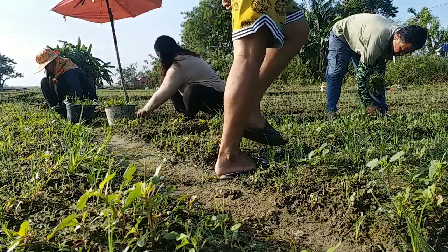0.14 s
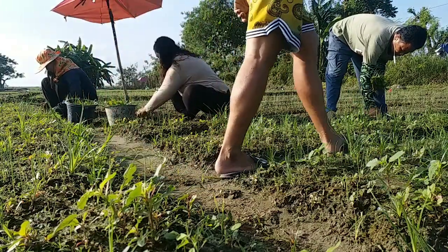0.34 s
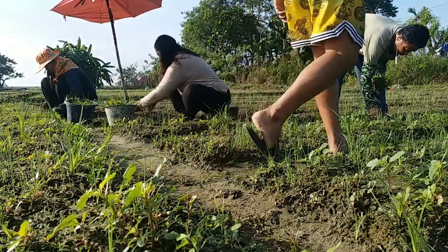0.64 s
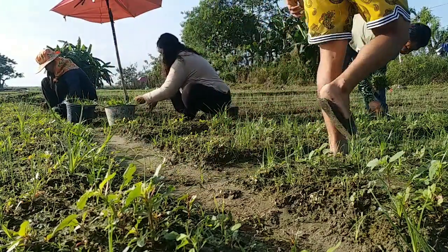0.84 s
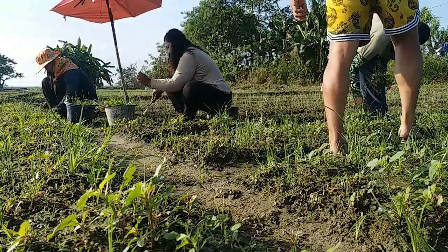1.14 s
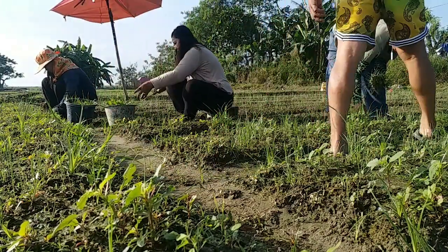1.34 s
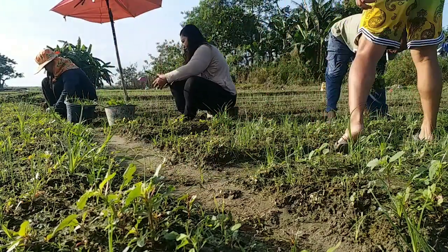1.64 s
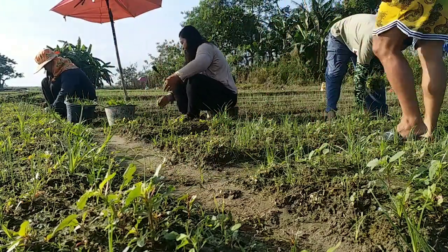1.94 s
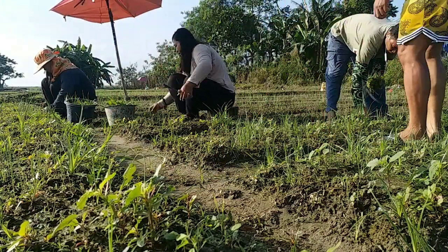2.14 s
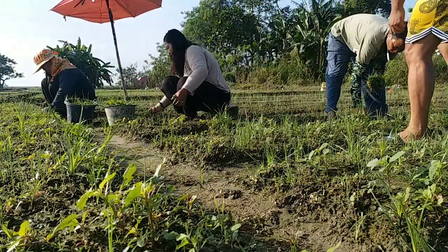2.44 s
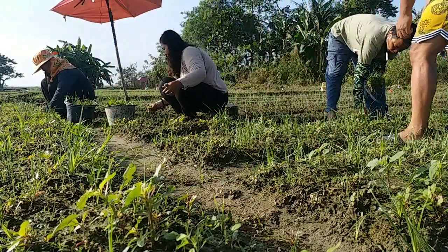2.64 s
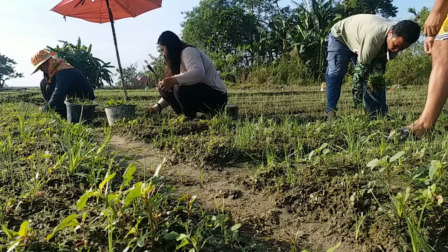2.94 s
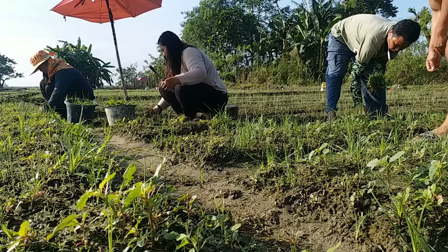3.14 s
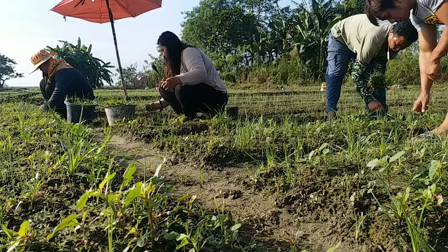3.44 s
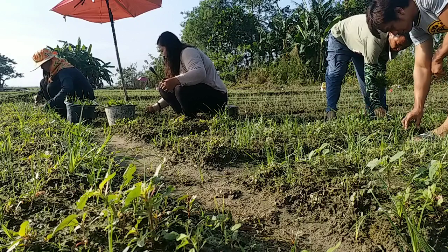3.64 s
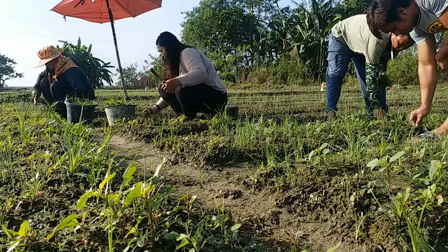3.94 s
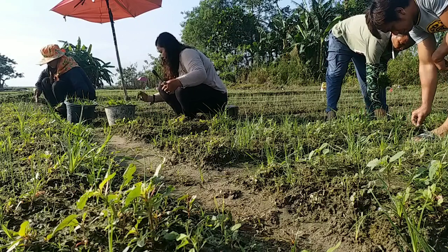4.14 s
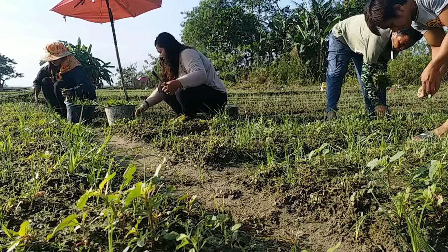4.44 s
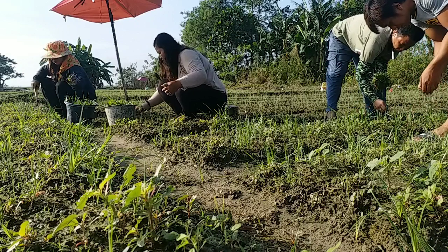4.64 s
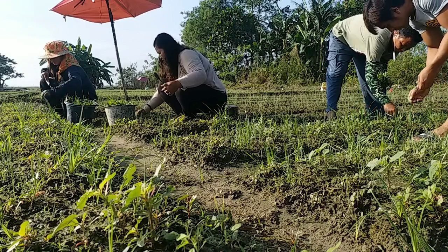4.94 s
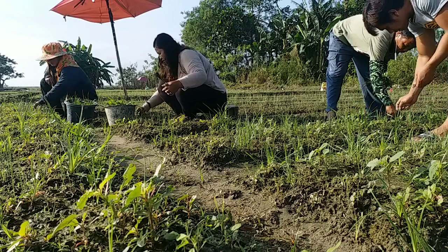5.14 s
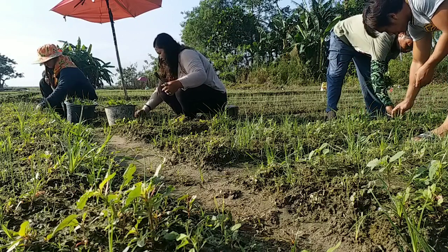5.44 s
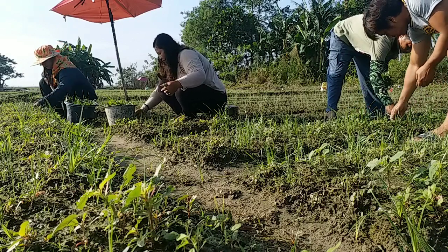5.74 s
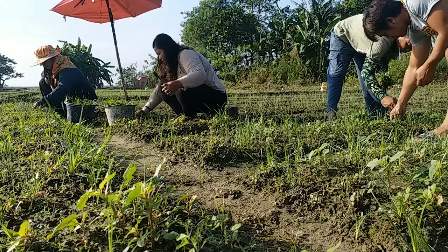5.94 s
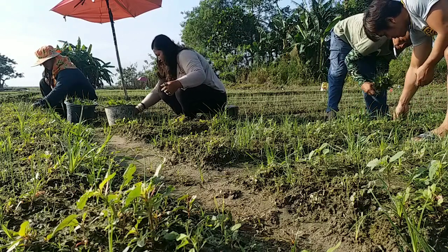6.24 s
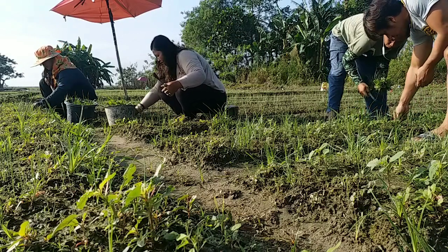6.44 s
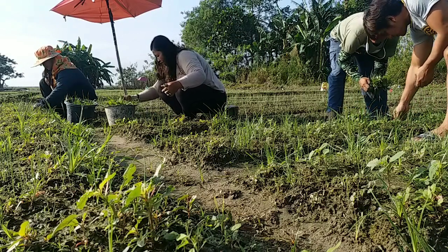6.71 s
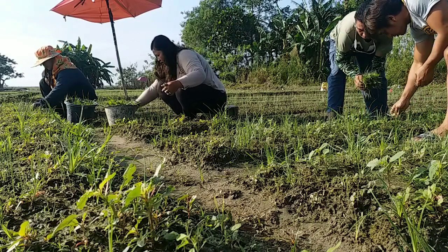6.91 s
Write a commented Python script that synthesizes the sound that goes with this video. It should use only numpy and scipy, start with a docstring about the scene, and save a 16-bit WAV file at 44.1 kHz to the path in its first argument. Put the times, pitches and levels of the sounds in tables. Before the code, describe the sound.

A small engine runs to the right of the microphone at an open vegetable field, booming and clattering. Sandals brush and slap through seedlings and loose parts knock while it slows. A wavering drone comes in as it sinks to a quiet, lumpy idle. It then picks up at low speed with a loose panel rattling, and a small bird chirps faintly three times. A faint hiss lies underneath.

```python
"""A four-cylinder engine runs beside a vegetable field: each firing drives a boom through the exhaust
and a roar and clatter through the resonant block. For three seconds sandals brush through seedlings
and loose parts knock, while the engine slows. A wavering drone enters as it sinks to a lumpy idle,
slowest at 4.4 s. It then picks up at low speed; from 5.3 s the firings shake a loose panel, near 5.8 s
a small bird chirps three times, and loose parts rattle again. A faint hiss lies under it all."""
import sys
import numpy as np
from scipy import signal
from scipy.fft import rfft, irfft
from scipy.io import wavfile
from scipy.ndimage import uniform_filter1d

SR = 44100
rng = np.random.default_rng(int(sys.argv[2]) if len(sys.argv) > 2 else 0)


def generate_wav(sig):
    """Save sig (samples, or channels by samples) to the path in sys.argv[1] as 16-bit PCM at SR."""
    pcm = np.round(np.clip(np.atleast_2d(sig).T, -1, 1) * 32767).astype(np.int16)
    wavfile.write(sys.argv[1], SR, pcm)


N = 311787
T = np.arange(N) / SR
HZ = np.maximum(np.fft.rfftfreq(N, 1 / SR), 1)

# side signal relative to mid signal in stereo noise: f/Hz, level/dB
SIDE_SPECTRUM = [(60, -26), (600, -16), (1200, -8), (2500, -5), (6000, -2)]
# cues of a source on the right: f/Hz, left minus right level/dB, lag of the left side/ms
DIRECTION_CUES = [(60, 1, .66), (130, -.3, .53), (270, -1, .35), (600, .3, .39), (1220, .5, .42),
                  (2000, -3.5, .41), (5200, -4.5, .41), (8000, 0, .41)]
# spectra of the broad hiss, the thin hiss and brushed leaves: f/Hz, level/dB
AIR_SPECTRUM = [(30, 19.5), (1000, -1.5), (6000, -3), (15500, -3.5)]
THIN_SPECTRUM = [(5500, -16), (6900, -17.5), (7500, 2), (7950, -2.5), (8200, -13)]
LEAF_SPECTRUM = [(2600, -8), (3450, 4), (4600, -2), (6000, -7), (7800, -12), (9000, -22), (14000, -30)]
# bird chirps: t/s, level/dB, highest f/Hz
BIRD_CHIRPS = [(5.826, -45, 3450), (5.864, -46.5, 3380), (5.908, -49.5, 3300)]
# sandals brushing through plants: t/s, level/dB, half length/s
LEAF_BRUSHES = [(0.467, -43.5, 0.023), (2.258, -53.5, 0.042), (2.502, -54, 0.072), (2.856, -53, 0.038),
                (2.967, -43, 0.021), (3.17, -44.5, 0.013), (3.206, -44, 0.016)]
# sandal slaps and snapping stalks: t/s, level/dB, centre f/Hz
SLAPS_AND_SNAPS = [(.442, -26.5, 6000), (1.461, -19.5, 3300), (2.964, -33, 4300), (3.176, -37.5, 4400),
                   (3.197, -39.5, 4900), (3.211, -37.5, 4600)]
# loose parts knocking: t/s, level/dB, centre f/Hz
LOOSE_KNOCKS = [(1.224, -24.5, 1780), (2.04, -18, 430), (2.467, -36, 1620), (2.715, -35, 1580),
                (6.206, -42, 3450), (6.216, -39.5, 2850), (6.251, -42, 2650), (6.273, -38.5, 2480),
                (6.298, -37.5, 2470), (6.318, -37, 2450), (6.786, -34, 1750)]
# course of the drone: t/s, f/Hz, level/dB
DRONE_COURSE = [(3.0, 432, -42), (3.6, 430, -48.5), (4.15, 425, -75.5), (5.1, 419, -60), (5.45, 425, -40.5),
                (5.9, 436.4, -42.5), (6.25, 413, -37.5), (6.6, 402.5, -49.5), (7.07, 424.4, -34)]

# engine speed: t/s, firing rate/Hz
FIRING_RATE = [(0, 62), (.5, 61), (.95, 60.4), (1.3, 56.6), (1.65, 54.2), (2, 49.5), (2.6, 44),
               (2.95, 41.7), (3.3, 37.5), (3.75, 31), (4.4, 26), (4.8, 28.7), (5.3, 30.2), (5.75, 36.6),
               (6, 33), (6.25, 31.4), (6.65, 30.9), (7.07, 32.6)]
# how hard the engine works, surging near idle: t/s, level/dB
ENGINE_EFFORT = [(0.0, -30), (0.33, -28), (0.62, -27.5), (0.95, -28), (2.03, -30), (2.13, -33.5),
                 (2.85, -32.5), (3.33, -41.5), (3.69, -44.5), (3.73, -55), (3.92, -54), (4.02, -47.5),
                 (4.33, -58.5), (4.4, -46), (4.53, -42.5), (4.6, -46.5), (4.67, -42), (4.83, -39.5),
                 (4.92, -43.5), (4.98, -41), (5.06, -44), (5.14, -39.5), (5.28, -40), (5.53, -36),
                 (5.68, -36.5), (5.8, -38.5), (6.05, -39.5), (6.34, -36), (7.07, -36.5)]
# pushes on the throttle: t/s, opening time/s, hold/s, closing time/s, opening (0-1)
THROTTLE_PUSHES = [(-2.4, 3.0, .66, .62, 1.0), (2.41, .05, .25, .26, .44), (4.33, .04, .14, .06, .38),
                   (4.64, .1, .11, .08, .5), (5.29, .06, 1.8, .1, .28), (5.28, .3, .1, .09, .54),
                   (6.06, .1, .12, 1.8, .48)]
# resonances of the loose panel: f/Hz, bandwidth/Hz, level/dB
PANEL_RESONANCES = [(1840, 93, 1.5), (2370, 100, -0.5), (2770, 120, -6.5), (3530, 126, -2)]
# resonances of the engine's panels and castings: f/Hz, bandwidth/Hz, lift at speed/dB, lift at idle/dB
CASTING_MODES = [(171, 12, 2, 2.5), (264.6, 7.5, 3.5, 13), (304, 23.5, 7, 6.5), (421, 23, 2, 3.5),
                 (571.2, 25, 8.5, 11), (625.8, 74, 12, 10.5), (958, 4.7, 9, 10), (1608, 67, -4.5, 7.5),
                 (1765, 36, 8, -1), (2040, 55, 9.5, -7), (2330, 150, 1, 2), (2550, 37, 9, -17),
                 (3100, 75, 8.5, -7.5)]
# firings harder than the rest: t/s, thud level/dB, ring level/dB
HARD_FIRINGS = [(.163, -21, -37), (.423, -25, -25), (.62, -25, -28), (1.514, -18, -35), (1.779, -24, -50),
                (5.504, -27, -38), (5.622, -33, -32), (5.678, -38, -35), (6.205, -32, -37),
                (6.462, -28, -38), (6.657, -27, -40), (6.691, -26, -37), (6.94, -26, -35)]
# spectra of a combustion knock and of the clatter at speed and at idle: f/Hz, level/dB
KNOCK_SPECTRUM = [(1000, -4), (1800, 0), (2900, -1), (3800, -10), (5200, -9), (8000, -16)]
FAST_CLATTER = [(1000, -12), (1380, -4), (1550, 2), (2100, -10.5), (2900, -14), (4100, -12.5), (5600, -17),
                (7700, -27.5), (8600, -43)]
IDLE_CLATTER = [(1000, 5), (1900, -3.5), (2900, -8), (3900, -13), (7000, -27)]
# spectra of the block's low roar, its mid-range growl and the exhaust's rumble: f/Hz, level/dB
ROAR_SPECTRUM = [(100, -13), (145, 2.5), (235, 0.5), (370, -2.5), (490, -5.5), (620, -23)]
GROWL_SPECTRUM = [(380, -12), (490, -26.5), (660, -8), (830, -6.5), (1100, -12), (1800, -25)]
RUMBLE_SPECTRUM = [(40, -23), (51, -31), (60, 5), (70, -9), (100, -7.5), (135, -13.5), (170, -14),
                   (300, -30)]
# exhaust harmonics: multiple of the firing rate, level/dB
EXHAUST_ORDERS = [(1, -3), (2, 1.5), (3, -2), (4, -1), (5, -22.5)]
# response of the silencer: f/Hz, gain/dB
SILENCER_GAIN = [(25, -57), (42, -16), (52, -6), (61, 6.5), (73, 4), (88, 15), (105, -3.5), (122, 2),
                 (160, -4), (190, -33), (248, -0.5), (308, 18)]
# firings that falter or catch hard: t/s, change of boom level/dB, half length/s
FIRING_STUMBLES = [(3.024, -4.5, 0.08), (3.335, -10, 0.01), (3.8, -3.5, 0.075), (4.046, 3, 0.03),
                   (4.254, 6, 0.043), (4.362, -18, 0.0088), (4.38, 7.5, 0.016), (4.81, 2.5, 0.051),
                   (4.933, -11, 0.011), (5.06, -10, 0.018), (5.122, 5, 0.048), (5.21, -10, 0.015),
                   (5.814, -15, 0.016), (5.838, 8.5, 0.026), (5.918, -20, 0.0086)]

# level laws: level/dB at middle effort with the throttle shut, dB per dB of effort, full-throttle lift/dB
PANEL_LAW, CLATTER_LAW = (-56.5, 1.3, 13), (-53.5, 0.95, 11.02)
ROAR_LAW, GROWL_LAW = (-34.5, 1, 0), (-43.5, 0.89, 3.97)
BOOM_LAW, RUMBLE_LAW = (-32, 0.6, 4.64), (0.55, -0.16, -12.5)   # rumble is relative to the orders
MIDDLE_EFFORT_DB, KNOCK_SPREAD_DB = -35, 2.1


def from_db(db):
    """Amplitude grows tenfold for every 20 dB."""
    return 10 ** (np.asarray(db) / 20)


def unit_power(x):
    """Division by the RMS value gives unit power."""
    return x / np.sqrt(np.mean(x ** 2) + 1e-20)


def in_time(rows):
    """Linear interpolation in time gives one curve per column."""
    times, *columns = np.transpose(rows)
    return [np.interp(T, times, column) for column in columns]


def at_hz(points, hz):
    """Interpolation on a logarithmic frequency axis."""
    f, value = np.transpose(points)
    return np.interp(np.log(hz), np.log(f), value)


def bell(centre_s, half_s):
    """A Gaussian pulse of unit height."""
    return np.exp(-.5 * ((T - centre_s) / half_s) ** 2)


def response(spectrum, lift_db=0):
    """A band-pass magnitude response of unit power, falling steeply beyond the spectrum's ends."""
    inside = np.minimum(1, np.minimum(HZ / spectrum[0][0], spectrum[-1][0] / HZ))
    return unit_power(from_db(at_hz(spectrum, HZ) + lift_db) * inside ** 6)


def colour(x, spectrum):
    """Filtering multiplies spectra; the result has unit power."""
    return unit_power(irfft(rfft(x) * response(spectrum), N))


def causal(gain):
    """Causality: with minimum phase, resonances ring only after the blow."""
    cepstrum = irfft(np.log(gain + 1e-4), N)
    cepstrum[1:] *= 2
    return np.exp(rfft(cepstrum[:N // 2], N))


def drift(rate_hz):
    """Low-passed noise is a random fluctuation, here of unit power."""
    return unit_power(irfft(rfft(rng.standard_normal(N)) / (1 + (HZ / rate_hz) ** 2), N))


def evened(x, span_s):
    """Division by the running RMS value holds the short-term power near 1."""
    size = max(int(span_s * SR), 2)
    power = np.mean(np.atleast_2d(x) ** 2, axis=0)
    return x / np.sqrt(uniform_filter1d(uniform_filter1d(power, size), size) + 1e-9)


def scattered_noise():
    """Stereo noise whose coherence falls from bass to treble."""
    mid, side = rfft(rng.standard_normal((2, N)))
    return unit_power(irfft(mid + from_db(at_hz(SIDE_SPECTRUM, HZ)) * side * [[1], [-1]], N))


def from_the_right(x):
    """Time and level differences give direction: the left side lags and its treble is shaded."""
    cues = np.array(DIRECTION_CUES)
    tilt = from_db(at_hz(cues[:, :2], HZ) / 2)
    lag_s = at_hz(cues[:, ::2], HZ) / 1000
    return irfft(rfft(x) * np.array([tilt * np.exp(-2j * np.pi * HZ * lag_s), 1 / tilt]), N)


def throttle_opening():
    """Superposed pushes each open the throttle, hold it and let it fall back."""
    return sum(opening * np.clip((T - s) / opens_s, 0, 1)
               * np.clip(1 - (T - s - opens_s - held_s) / closes_s, 0, 1)
               for s, opens_s, held_s, closes_s, opening in THROTTLE_PUSHES)


def level_of(law):
    """A layer's level in dB is linear in the engine's effort and the throttle opening."""
    base_db, slope, open_db = law
    effort_db = in_time(ENGINE_EFFORT)[0] - MIDDLE_EFFORT_DB
    return base_db + slope * effort_db + open_db * throttle_opening()


def hiss(air_db=-60.5, thin_db=-66.5, swell=0.56):
    """Filtered noise: a steady broad band, and a thin high one that swells with the engine."""
    roar_db = level_of(ROAR_LAW)
    swell_db = swell * (roar_db - np.median(roar_db))
    air = from_db(air_db) * colour(rng.standard_normal((2, N)), AIR_SPECTRUM)
    thin = from_db(thin_db + swell_db) * colour(rng.standard_normal((2, N)), THIN_SPECTRUM)
    return air + thin


def bird(length_s=0.022, crest=0.3, bend_hz=1100, waver=0.025, echo_s=0.014):
    """Frequency-modulated chirps rise a little, then fall; scattering by trees adds a short echo."""
    chirps = np.zeros(N)
    hoarseness = 1 + waver * drift(367)
    for s, db, top_hz in BIRD_CHIRPS:
        progress = np.clip((T - s) / length_s, 0, 1)
        hz = (top_hz - bend_hz * (progress - crest) ** 2) * hoarseness
        chirps += from_db(db) * np.sin(np.pi * progress) * np.sin(2 * np.pi * np.cumsum(hz) / SR)
    echo = np.exp(-T[:SR // 10] / echo_s) * rng.standard_normal(SR // 10)
    return chirps + signal.fftconvolve(chirps, echo / np.sqrt(2 * np.sum(echo ** 2)))[:N]


def impacts(rows, width, decay_s, count, attack_s):
    """Damped free vibration: each slightly soft blow excites a cluster of neighbouring modes."""
    out = np.zeros(N)
    age = T[:SR // 10]
    envelope = (1 - np.exp(-(age / attack_s) ** 2)) * np.exp(-age / decay_s)
    for s, db, hz in rows:
        modes_hz = hz * (1 + width) ** np.linspace(-1, 1, count) * rng.uniform(.96, 1.04, count)
        ring = np.sin(2 * np.pi * (modes_hz[:, None] * age + rng.random((count, 1)))).sum(axis=0)
        start = int(s * SR)
        out[start:start + len(age)] += (from_db(db) * unit_power(ring) * envelope)[:N - start]
    return out


def footsteps(grain_db=3.5):
    """Friction and impact: leaves flick past the sandals in grainy swishes, soles slap, stalks snap."""
    strokes = sum(from_db(db) * bell(s, half_s) for s, db, half_s in LEAF_BRUSHES)
    swishes = strokes * colour(scattered_noise() * from_db(grain_db * drift(180)), LEAF_SPECTRUM)
    return swishes + impacts(SLAPS_AND_SNAPS, width=0.38, decay_s=.0025, count=30, attack_s=0.0004)


def rattles():
    """Impact excitation: loose parts knock and ring briefly."""
    return impacts(LOOSE_KNOCKS, width=.07, decay_s=.0065, count=7, attack_s=0.00083)


def drone(fade_s=0.092):
    """Random amplitude and frequency modulation roughen a tone that comes and goes."""
    hz, db = in_time(DRONE_COURSE)
    fade_in = np.clip((T - DRONE_COURSE[0][0]) / fade_s, 0, 1)
    db = db + 2.5 * drift(15)
    hz = hz * (1 + .012 * drift(25))
    return fade_in * from_db(db) * np.sin(2 * np.pi * np.cumsum(hz) / SR)


def firing_bursts(firings, rate_hz, decay_s, spread_db):
    """Exponential decay: each firing restarts an envelope at a strength of its own."""
    strength = from_db(spread_db * rng.standard_normal(1000))
    age = (firings % 1) / rate_hz
    return evened(strength[firings.astype(int)] * np.exp(-age / decay_s), 1.0)


def knocking(firings, ring_s, spread_db, jitter_s=.0003):
    """A jittered impulse train: each firing cracks, partly with the same waveform, partly anew."""
    onsets = np.flatnonzero(np.diff(np.floor(firings)))
    late, size = rng.standard_normal((len(onsets), 2)).T
    blows = np.zeros(N)
    blows[np.clip(onsets + (late * jitter_s * SR).astype(int), 0, N - 1)] = from_db(spread_db * size)
    decay = np.exp(-T[:SR // 20] / ring_s)
    repeated = signal.fftconvolve(blows, decay * rng.standard_normal(len(decay)))[:N]
    fresh = signal.fftconvolve(blows, decay)[:N] * scattered_noise()
    return evened(.5 * repeated + fresh, 0.33)


def casting(x, pace, fast_spectrum, idle_spectrum):
    """Resonance: the engine's modes filter x; pace blends the responses at idle (0) and at speed (1)."""
    fast_db, idle_db = sum(np.outer(lifts, 1 / (1 + (2 * (HZ - hz) / width) ** 2))
                           for hz, width, *lifts in CASTING_MODES)
    drive = rfft(x)
    fast = irfft(drive * causal(response(fast_spectrum, fast_db)), N)
    idle = irfft(drive * causal(response(idle_spectrum, idle_db)), N)
    return pace * fast + (1 - pace) * idle


def loose_panel(firings, start_s=5.345, chatter=0.6):
    """Forced vibration: from start_s a loose panel rings with each firing and chatters in between."""
    blows = knocking(firings, ring_s=.007, spread_db=3.5) + chatter * scattered_noise()
    modes = sum((-1) ** k * from_db(db) / (1 + 2j * (HZ - hz) / width)
                for k, (hz, width, db) in enumerate(PANEL_RESONANCES))
    ringing = unit_power(irfft(rfft(blows) * modes, N))
    return from_db(level_of(PANEL_LAW)) * (T > start_s) * ringing


def bangs(pace, decay_s=0.004):
    """Transient response: a hard firing sets the whole casting ringing, with a thud below."""
    cracks = np.zeros((2, N))
    decay = np.exp(-T[:SR // 20] / decay_s)
    for s, thud_db, ring_db in HARD_FIRINGS:
        start = int(s * SR)
        burst = decay * rng.standard_normal(len(decay))
        cracks[:, start:start + len(decay)] += from_db([[thud_db], [ring_db]]) * burst
    thud = casting(cracks[0], pace, GROWL_SPECTRUM, GROWL_SPECTRUM)
    strike = irfft(rfft(cracks[1]) * from_db(at_hz(KNOCK_SPECTRUM, HZ)), N)
    return thud + casting(strike, pace, FAST_CLATTER, IDLE_CLATTER)


def clatter(firings, rate_hz, pace, load, knock, flutter_db=1.5, knock_db=-2.0):
    """Modulated mechanical noise excites the high modes; under load each firing stands out as a knock."""
    bursts = firing_bursts(firings, rate_hz, decay_s=0.19, spread_db=KNOCK_SPREAD_DB)
    envelope = from_db(flutter_db * drift(18)) + (0.026 + .2 * load) * bursts
    wash = evened(scattered_noise() * envelope, 0.86)
    cracks = from_db(knock_db) * irfft(rfft(knock) * response(KNOCK_SPECTRUM), N)
    ringing = casting(wash + cracks, pace, FAST_CLATTER, IDLE_CLATTER)
    return from_db(level_of(CLATTER_LAW)) * evened(ringing, 0.066)


def block(firings, rate_hz, pace, knock, pulse_db=-4.0, half_order_db=-4.0, thud_db=-7.0, steady=3.0):
    """Forced vibration: firing pulses, knocks and gusts of gas noise shake the engine's body."""
    pulses = sum(from_db(half_order_db * (k % 2) + 5.3 * drift(5.4))
                 * np.cos(np.pi * k * firings + rng.uniform(0, 2 * np.pi))
                 for k in range(5, 44))   # odd k: half orders from unequal cylinders
    lowpass = signal.butter(4, 1300, fs=SR, output="sos")
    gusts = scattered_noise() * (steady + firing_bursts(firings, rate_hz, decay_s=0.012, spread_db=9.0))
    shaking = unit_power(signal.sosfilt(lowpass, gusts)) + from_db(pulse_db) * unit_power(pulses)
    thuds = from_db(thud_db) * unit_power(signal.sosfilt(lowpass, knock * (1 - pace / 2)))
    roar = evened(casting(shaking, pace, ROAR_SPECTRUM, ROAR_SPECTRUM), 0.16)
    growl = evened(casting(shaking + thuds, pace, GROWL_SPECTRUM, GROWL_SPECTRUM), 0.054)
    return from_db(level_of(ROAR_LAW)) * roar + from_db(level_of(GROWL_LAW)) * growl


def exhaust(firings, rate_hz, resonance_share=0.24, waver_db=.8):
    """Harmonics slide through the silencer's resonances; off the throttle, uneven firing rumbles."""
    orders, power = 0, 0
    for multiple, db in EXHAUST_ORDERS:
        gain = from_db(db + at_hz(SILENCER_GAIN, multiple * rate_hz))
        waver = from_db(waver_db * drift(4))
        orders += gain * waver * np.cos(2 * np.pi * (multiple * firings + rng.random()))
        power += gain ** 2
    rumble = evened(colour(scattered_noise(), RUMBLE_SPECTRUM), 0.39)
    boom = evened(orders, 0.015) + from_db(level_of(RUMBLE_LAW)) * rumble
    resonant_swell = (power / power.mean()) ** (resonance_share / 2)
    stumble_db = sum(db * bell(s, half_s) for s, db, half_s in FIRING_STUMBLES)
    return from_db(level_of(BOOM_LAW) + stumble_db) * resonant_swell * evened(boom, 0.046)


def engine(idle_hz=37, fast_hz=52):
    """Periodic excitation: one crankshaft times the firings; the open throttle makes them knock."""
    rate_hz = in_time(FIRING_RATE)[0] * (1 + .002 * drift(14))
    firings = .92 + np.cumsum(rate_hz) / SR   # phase, one cycle per firing
    pace = np.clip((rate_hz - idle_hz) / (fast_hz - idle_hz), 0, 1)
    load = np.minimum(throttle_opening(), 1) ** 2
    knock = load * knocking(firings, ring_s=.0058, spread_db=KNOCK_SPREAD_DB)
    crack = knock * (.35 + .65 * pace)   # harder at speed
    return (exhaust(firings, rate_hz) + block(firings, rate_hz, pace, knock)
            + clatter(firings, rate_hz, pace, load, crack) + loose_panel(firings) + bangs(pace))


def scene():
    """Superposition: engine, walker and bird lie to the right, the hiss on both sides."""
    return from_the_right(rattles() + engine() + drone() + footsteps() + bird()) + hiss()


def record(dry, cutoff_hz=15600):
    """Band limiting: an elliptic low-pass filter cuts the top steeply."""
    return signal.sosfilt(signal.ellip(10, .1, 90, cutoff_hz, fs=SR, output="sos"), dry)


dry = scene()
out = record(dry)
generate_wav(out)
```